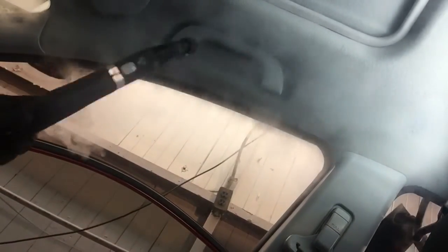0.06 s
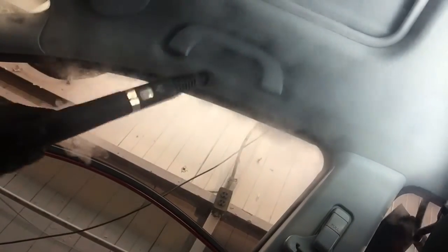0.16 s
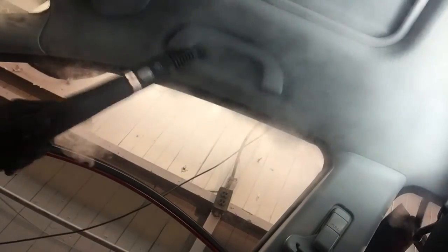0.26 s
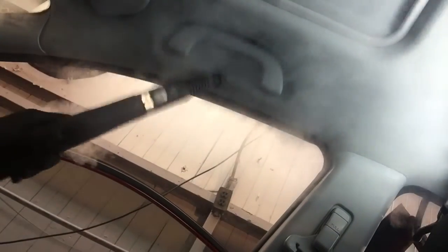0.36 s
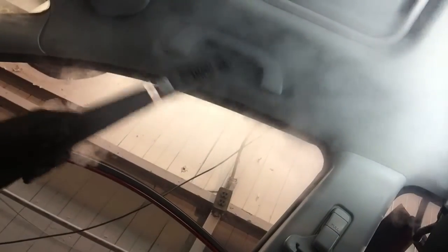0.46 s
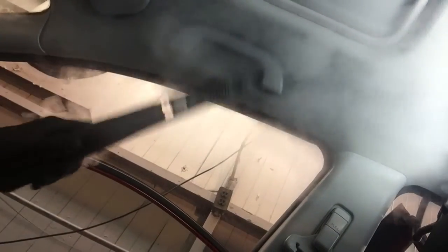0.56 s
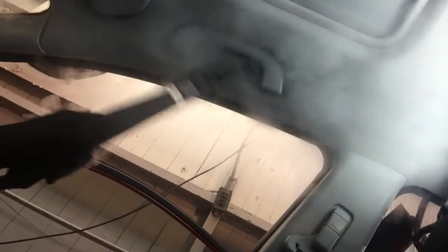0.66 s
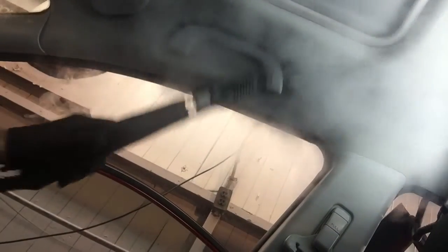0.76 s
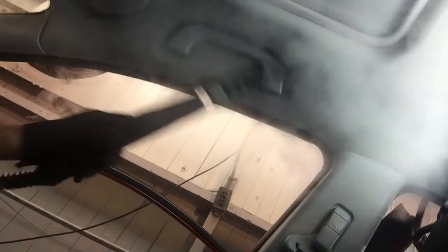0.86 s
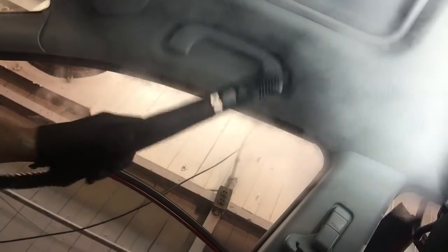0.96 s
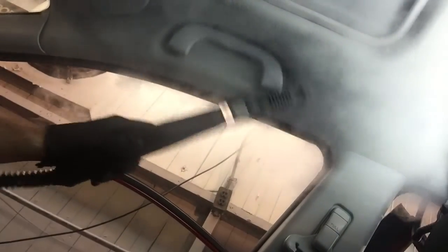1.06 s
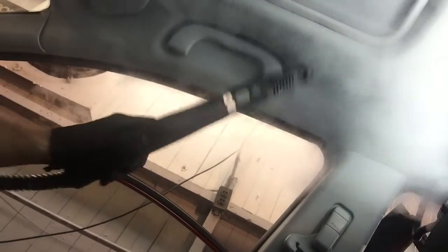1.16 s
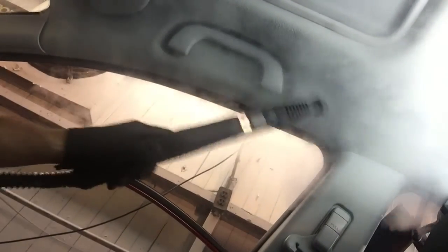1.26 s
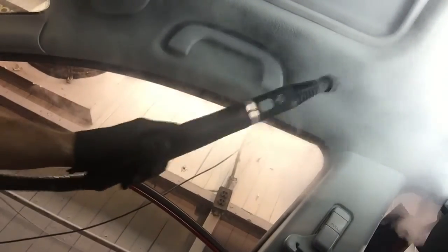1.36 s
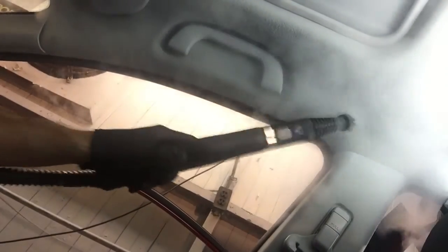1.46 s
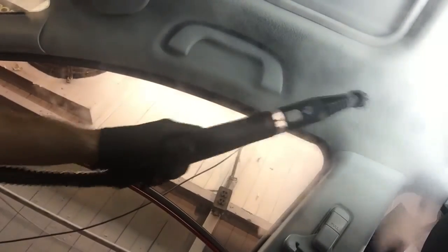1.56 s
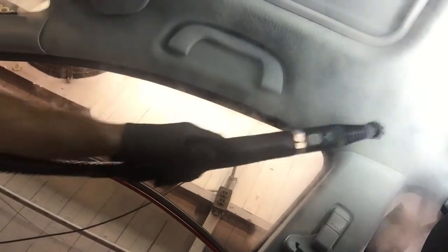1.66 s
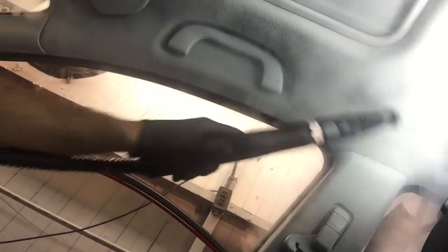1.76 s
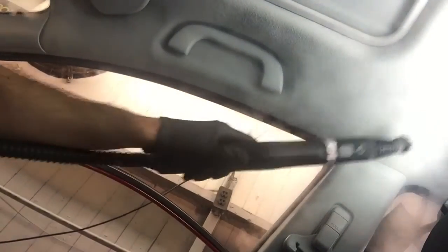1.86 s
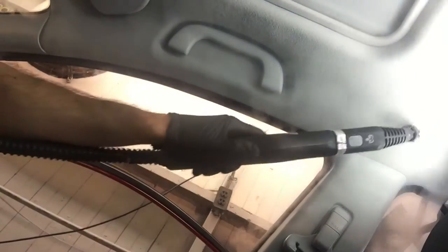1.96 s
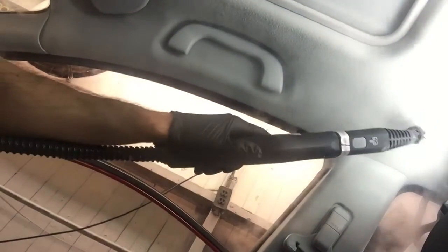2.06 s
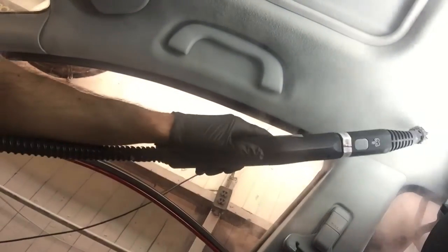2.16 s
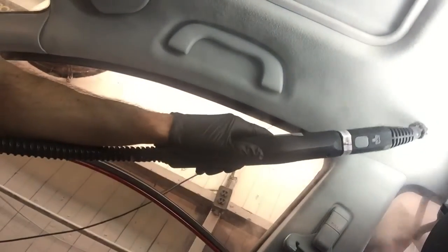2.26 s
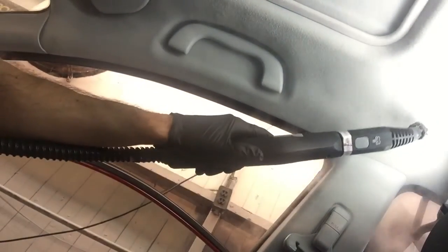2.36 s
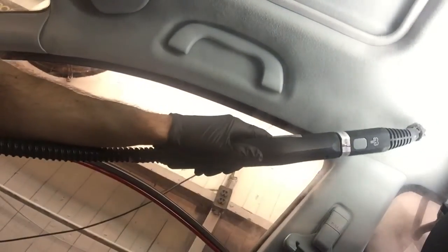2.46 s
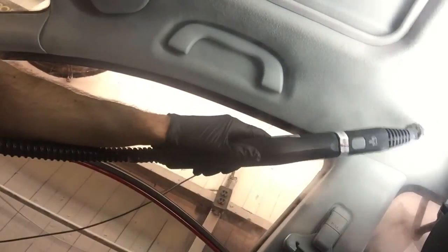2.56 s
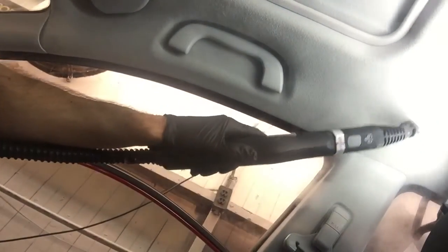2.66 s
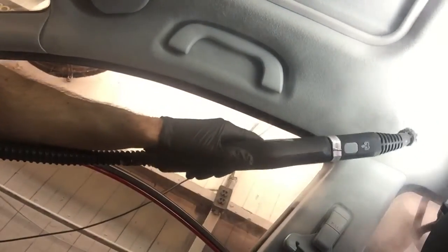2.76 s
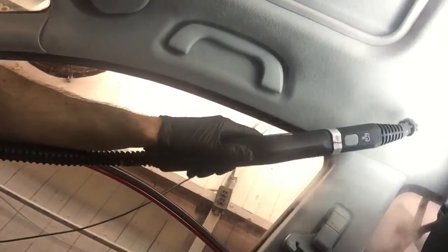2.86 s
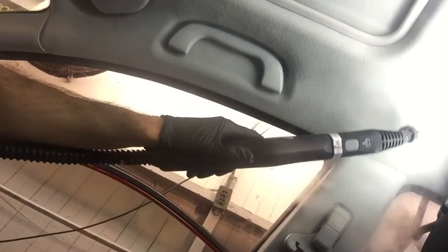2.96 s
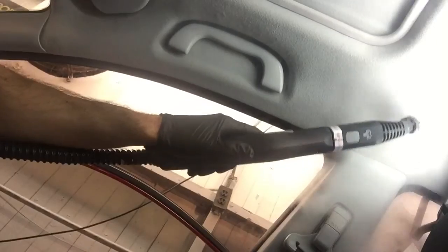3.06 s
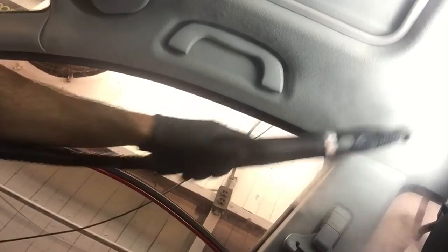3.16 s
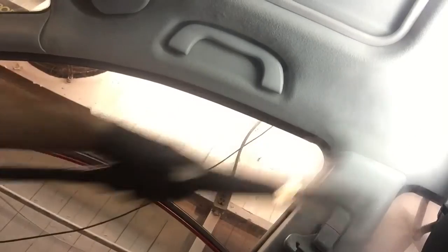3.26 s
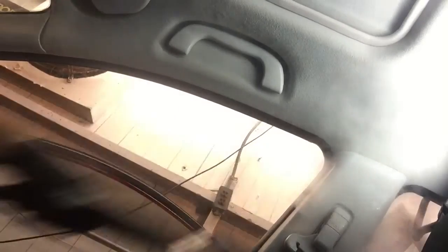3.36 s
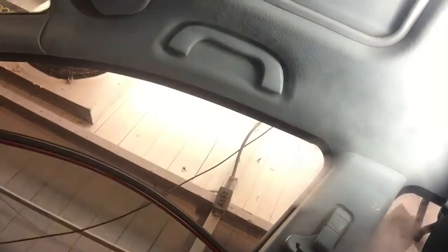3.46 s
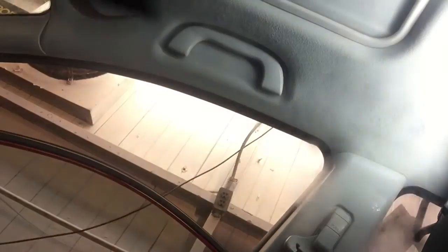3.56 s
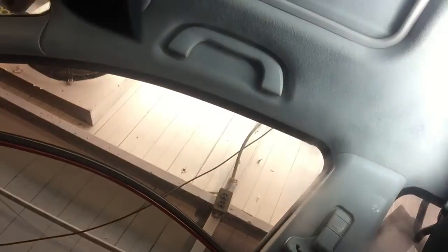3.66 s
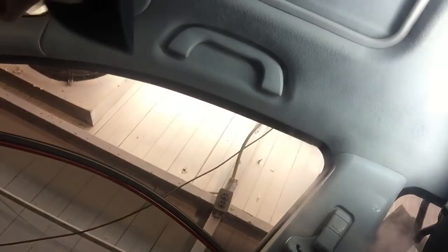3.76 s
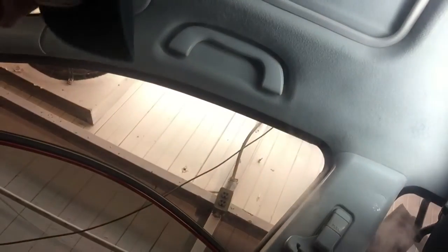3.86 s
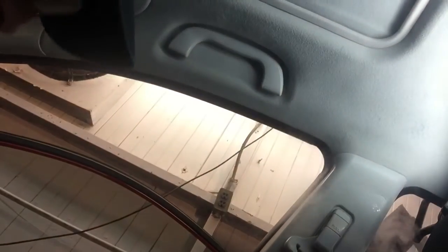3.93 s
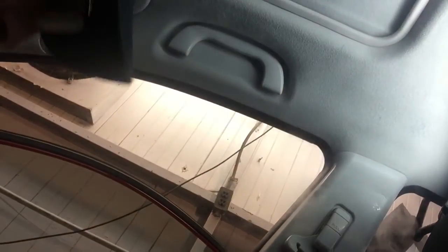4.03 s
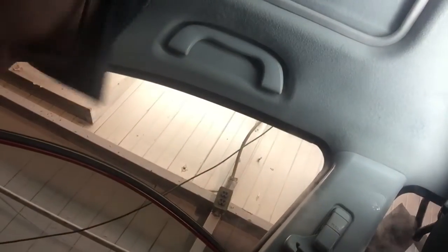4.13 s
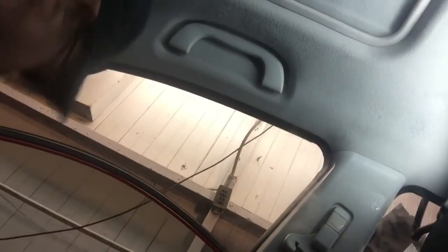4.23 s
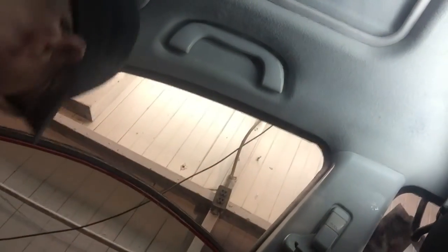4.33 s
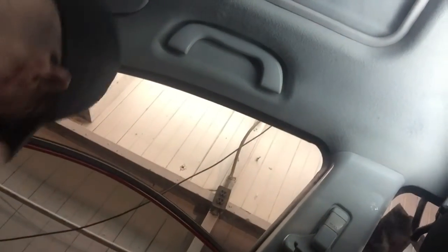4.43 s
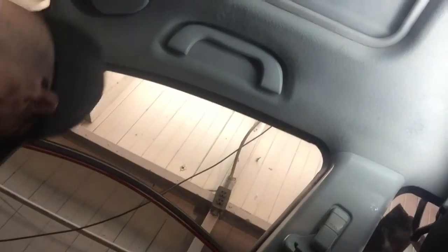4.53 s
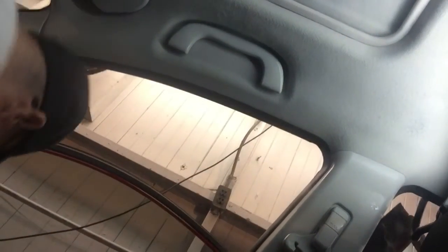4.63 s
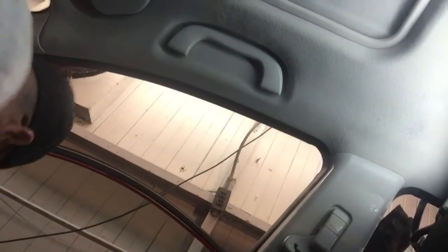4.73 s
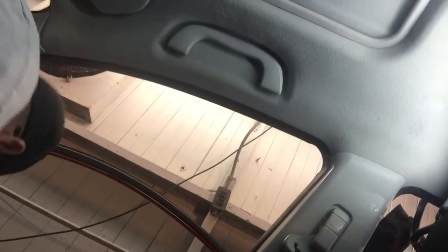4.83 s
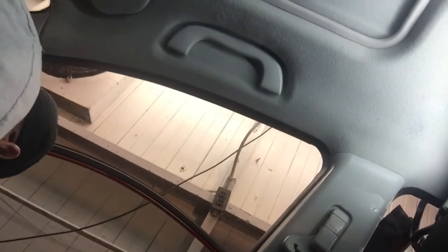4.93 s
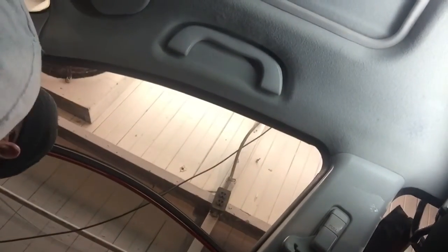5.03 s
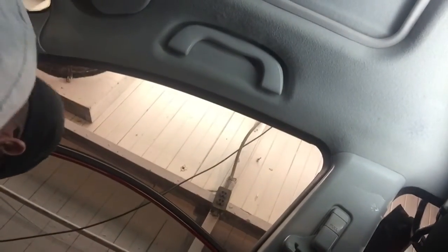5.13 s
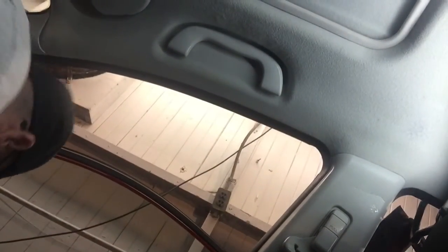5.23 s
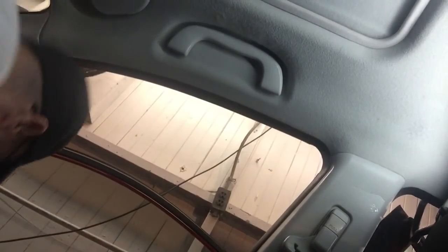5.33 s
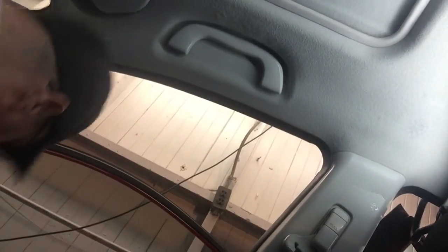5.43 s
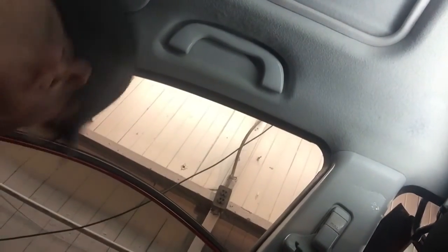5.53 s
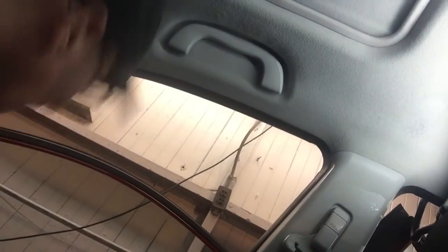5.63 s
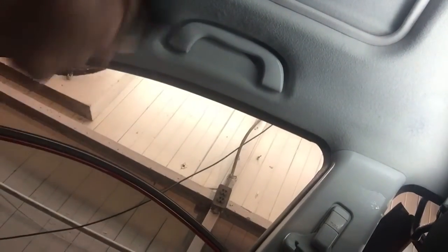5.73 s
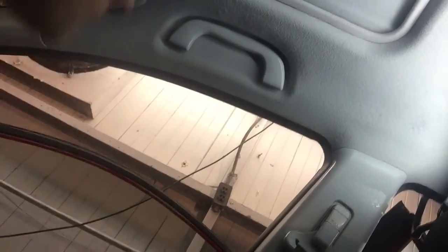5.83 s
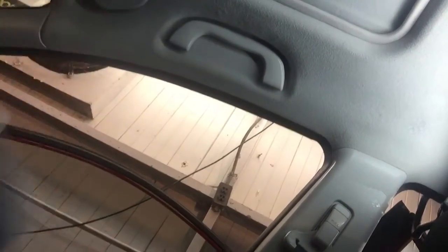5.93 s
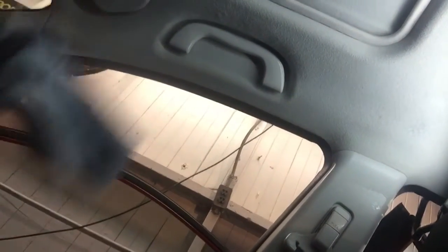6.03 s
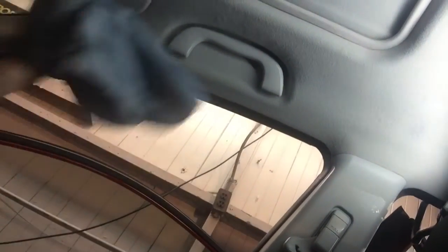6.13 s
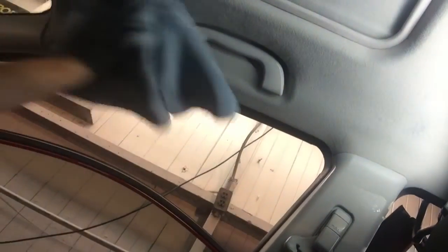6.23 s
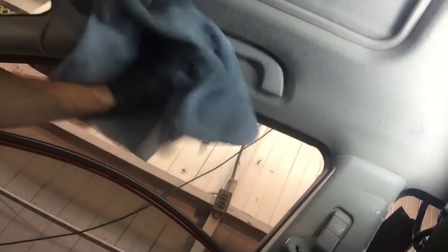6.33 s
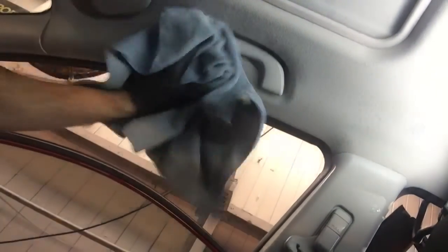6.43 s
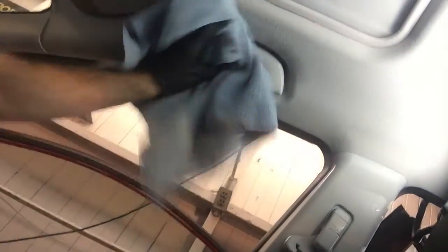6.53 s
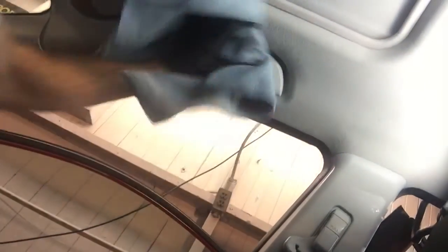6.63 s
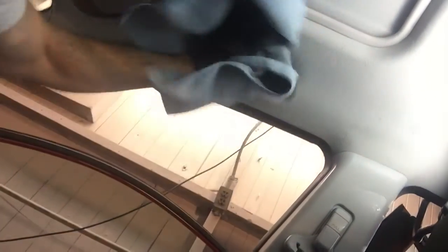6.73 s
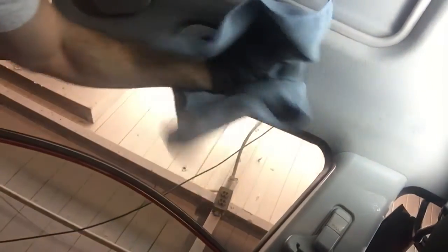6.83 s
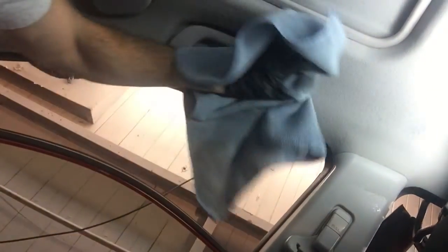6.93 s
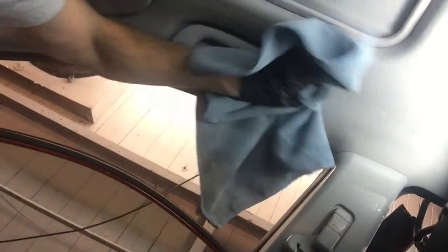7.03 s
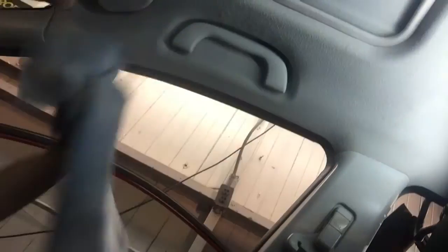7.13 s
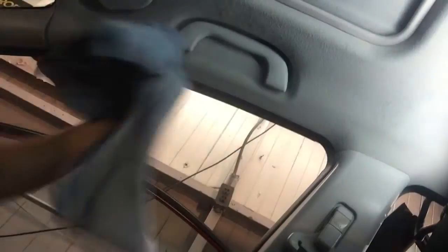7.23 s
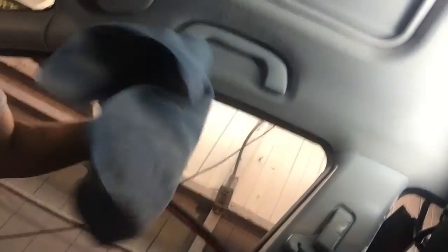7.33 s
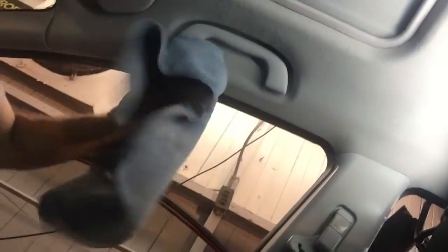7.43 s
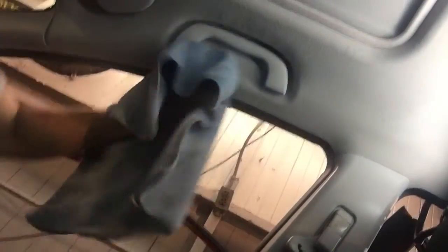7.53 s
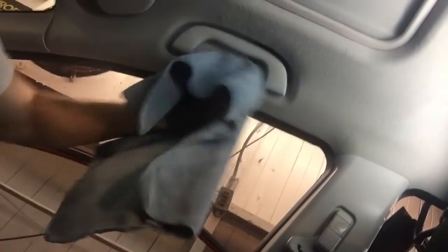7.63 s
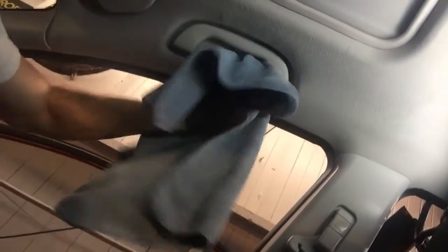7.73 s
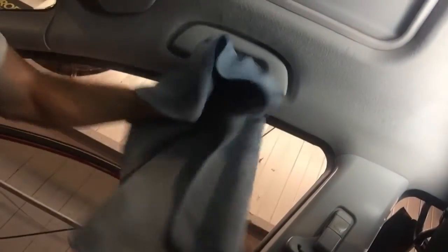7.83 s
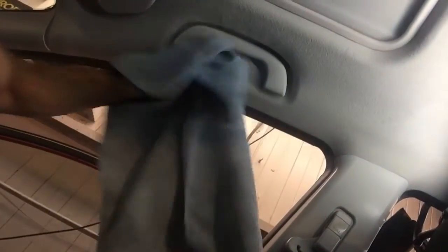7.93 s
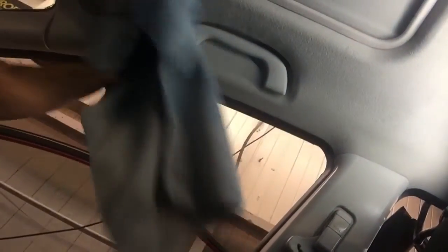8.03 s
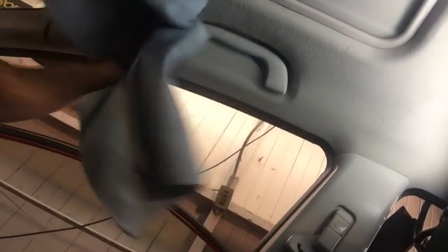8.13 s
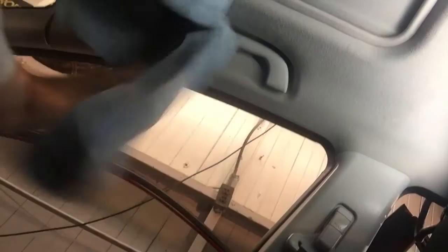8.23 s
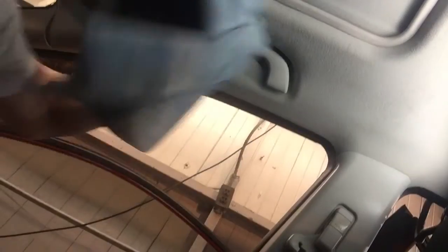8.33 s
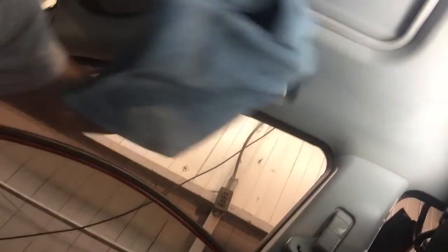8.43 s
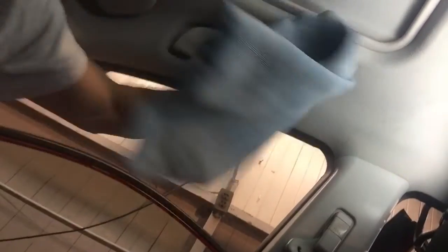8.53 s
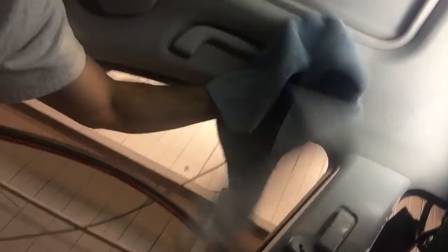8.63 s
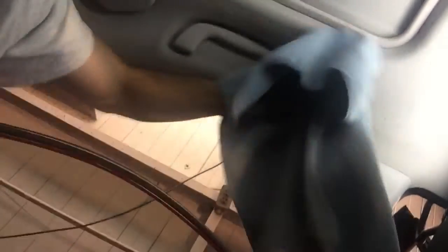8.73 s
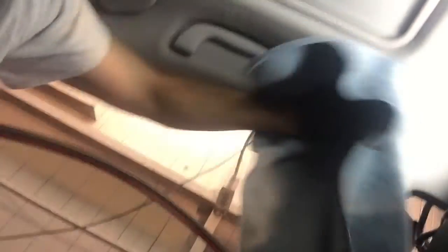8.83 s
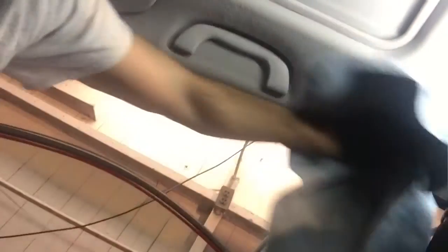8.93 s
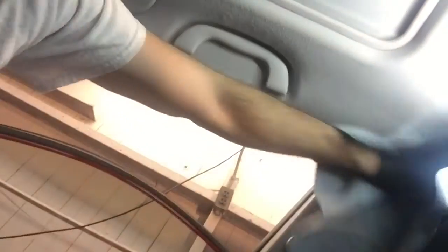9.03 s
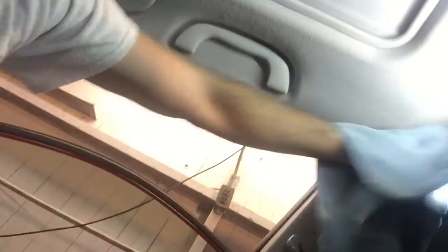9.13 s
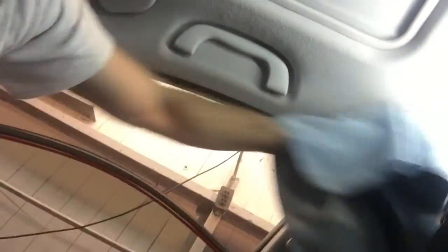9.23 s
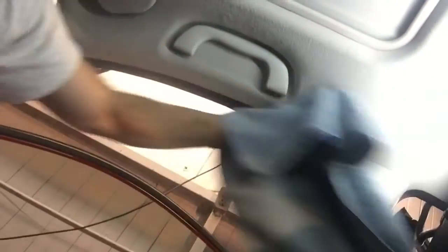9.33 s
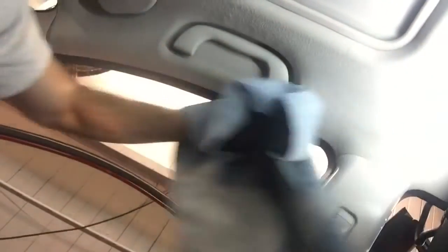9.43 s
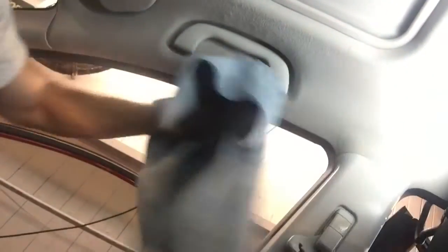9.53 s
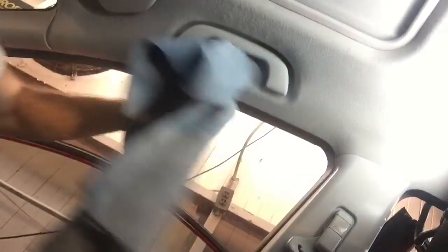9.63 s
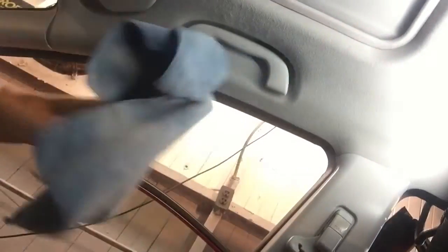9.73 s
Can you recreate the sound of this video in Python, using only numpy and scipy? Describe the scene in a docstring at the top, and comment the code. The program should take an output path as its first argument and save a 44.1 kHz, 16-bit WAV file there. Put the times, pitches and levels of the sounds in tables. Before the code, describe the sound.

Strong bright steam hiss for three seconds, a spitting cutoff, one hard clattering bang, near quiet, then brisk cloth scrubbing with hollow thumps.

```python
"""A steam jet hisses and roars over a car's roof lining, rests in a corner and sputters out.
The handheld steamer is set down with a bang, small things knock, then a towel rubs the lining:
the fibres hiss, the panel drones and the car body thuds. Behind it all is the microphone's own hiss.
Steam, cloth, car and hiss are shaped noise; knocks, bubbles and the ringing tool also use sine tones."""
import sys
import numpy as np
from scipy import signal
from scipy.fft import rfft, irfft, next_fast_len
from scipy.io import wavfile
from scipy.ndimage import uniform_filter1d, map_coordinates

SR = 44100
rng = np.random.default_rng(int(sys.argv[2]) if len(sys.argv) > 2 else 0)


def unload_audio(sound):
    """Save the sound as a 16-bit wav file, at the path given as the first command line argument."""
    columns = np.transpose(np.atleast_2d(sound))
    # keep every value between -1 and 1, then stretch to whole-number steps
    steps = np.round(np.clip(columns, -1, 1) * 32767)
    wavfile.write(sys.argv[1], SR, steps.astype(np.int16))


N = 431298  # length in samples


def amp(db):
    """Turn decibels into a gain."""
    return 10 ** (np.asarray(db) / 20)


def unit(x):
    """Scale x to an rms level of 1."""
    return x / np.sqrt(np.mean(x ** 2) + 1e-20)


def along(points, hz):
    """Read a curve of (pitch_hz, value) points, with pitch on a log scale."""
    f, v = np.transpose(points)
    return np.interp(np.log(hz + 1), np.log(f + 1), v)


def over_time(points):
    """Read a curve of (time_s, value) points at every sample."""
    return np.interp(np.arange(N) / SR, *np.transpose(points))


def wobble(rate):
    """A smooth random curve with rate random points a second."""
    points = rng.standard_normal(int(N * rate / SR) + 4)
    return map_coordinates(points, [np.arange(N) * rate / SR])


def filtered(x, response):
    """Shape x by a gain, real or complex, that depends on frequency."""
    m = next_fast_len(len(x) + SR // 2)  # spare room keeps the tail from wrapping round
    return irfft(rfft(x, m) * response(np.fft.rfftfreq(m, 1 / SR)), m)[..., :len(x)]


def resonance(f, centre_hz, width_hz):
    """Response of one springy part: strongest at its own pitch."""
    push = 1j * f * width_hz
    return push / (centre_hz ** 2 - f * f + push)


def swell_and_fade(u, fall=1.0):
    """A quick swell that then dies away; with fall 1 it peaks at 1 when u = 1."""
    return u * np.exp(1 - fall * u)


def patchy(patchy_db, size, comb_db, count, flares=()):
    """Noise with random loud and soft patches and the fine comb of the cabin's reflections."""
    hz, t, z = signal.stft(rng.standard_normal(N), SR, nperseg=512)
    field = rng.standard_normal(z.shape)
    for axis in (0, 1, 0, 1):
        field = uniform_filter1d(field, size[axis], axis)  # size = (frequency bins, time frames)
    field = patchy_db * unit(field)
    for s, centre_hz, db in flares:
        in_pitch = np.exp(-(np.log((hz + 1) / centre_hz) / .1) ** 2)
        in_time = np.exp(-((t - s) / .032) ** 2)
        field += db * np.outer(in_pitch, in_time)
    patches = signal.istft(z * amp(field), nperseg=512)[1]
    z = signal.stft(patches, nperseg=1024)[2]
    comb = rng.standard_normal(z.shape)
    for _ in range(2):
        comb = uniform_filter1d(comb, count, 1)  # a larger count of frames holds the comb stiller
    return signal.istft(z * amp(comb_db * unit(comb)), nperseg=1024)[1][:N]


# How steam pressure and treble change: start_s, level_db (before the band levels),
# treble_lift_db (before each band's share), sink (0-1, how far the 4 kHz band drops toward 3 kHz)
JET = [(0, -23.5, 1, 0), (.56, -22.5, 0, 0), (.8, -22.5, 3, 0), (.98, -22, -1, 1), (1.45, -23, 0.85, 1),
       (1.52, -23, .6, 0), (1.699, -25, 3.5, 0), (1.83, -21.5, -2.5, 0.3), (1.9, -23.5, 1, .1),
       (2.65, -22, 0, .1), (3.22, -23.5, 1, .1)]
# Colour of the jet moving along the lining: pitch_hz, level_db (per Hz, relative)
MOVING_COLOUR = [(60, -37), (369, -13.5), (561, -14), (725, -23.5), (854, -16.5), (1130, -18), (1930, -7.5),
                 (2220, -11), (3700, -3), (4500, -6.5), (5000, -14.5), (6630, -3.5), (10300, -4.5),
                 (11300, 3), (15700, -7.5)]
# Colour of the jet held in the corner: pitch_hz, level_db (per Hz, relative)
CORNER_COLOUR = [(60, -42), (378, -12.5), (549, -13), (676, -26), (815, -11.5), (1270, -14), (2320, -6.5),
                 (3550, -8.5), (4070, 1.5), (4420, -8), (4790, -20.5), (6790, -5.5), (8600, -18),
                 (12700, -6), (15700, -16)]
# Extra colour when the band has sunk: pitch_hz, change_db
SUNK_COLOUR = [(2300, -0.5), (3000, 4.5), (3500, 3), (4200, -4), (4900, -5), (6200, 0)]
# Where the jet splits into five bands, roar to top: pitch_hz
EDGES_HZ = [2200, 4800, 7800, 10400]
# One value per band, roar to top: level_db against the jet, moving and then cornered
MOVING_DB = (-12.5, -5, -2.5, -1, 0.5)
CORNER_DB = (-13.5, -2, -3.5, -5, -1.5)
# One value per band, roar to top: share of the treble lift
LIFT_SHARE = (0, 0.19, 0.59, 0.98, 0.45)
# The nozzle touches the corner, settles in it, leaves: time_s, share (0-1)
REACH = [(1.74, 0.02), (1.77, 1), (1.86, 0.8), (1.885, 0), (1.93, 0.16), (1.97, 0.99), (3.27, 0.94),
         (3.3, 0.08)]
# The valve closing: time_s, level_db (before each band's fading factor)
VALVE = [(3.235, 0), (3.268, -8), (3.31, -21.5), (3.34, -26), (3.462, -29), (3.472, -44), (3.53, -57),
         (3.6, -93.5)]
# Narrow parts of the hiss flare up briefly: time_s, pitch_hz (centre), rise_db
FLARES = [(.125, 11400, 12), (.264, 6200, 10), (.313, 11100, 11.5), (.447, 6300, 11.5), (.508, 9450, 8.5),
          (.641, 5500, 14.5), (.656, 12580, 10.5), (.729, 11000, 10), (.81, 3700, 7), (.836, 7300, 9),
          (1.03, 3300, 5), (1.24, 3400, 5), (1.53, 4000, 6), (1.55, 5800, 12), (1.71, 5870, 12.5),
          (1.94, 11500, 8), (2.03, 11200, 8), (2.078, 11800, 8), (2.84, 12000, 9), (3.05, 12500, 9)]
# The cabin's bright bands, where weaker flares come at random: pitch_hz
BRIGHT_HZ = (6570, 9300, 11300, 12600)
FLARES_PER_S, FLARE_DB = 12, 3.5  # averages for the weaker flares


def steam():
    """Rushing steam makes turbulent noise; narrow bands flare up as the nozzle moves."""
    cornered = np.clip(over_time(REACH), 0, 1)
    shut_db = over_time(VALVE)
    chance = rng.random((40, 3))
    when = np.cumsum(2 * chance[:, 0]) / FLARES_PER_S
    which = (len(BRIGHT_HZ) * chance[:, 1]).astype(int)
    weak = zip(when, np.take(BRIGHT_HZ, which), 2 * FLARE_DB * chance[:, 2])
    moving = patchy(2.3, size=(10, 4), comb_db=3.0, count=8, flares=[*FLARES, *weak])
    still = patchy(1.7, size=(7, 6), comb_db=3.5, count=40, flares=FLARES)

    t = np.arange(N) / SR
    s, level, lift, sink = np.transpose(JET)
    sunk = np.clip(np.interp(t, s, sink), 0, 1)
    edges, jet = [0, *EDGES_HZ, SR], np.zeros(N)
    fadings = (0.51, 0.83, 0.79, 1.17, 1.15)  # the top bands die fastest as pressure falls
    bands = zip(edges, edges[1:], MOVING_DB, CORNER_DB, LIFT_SHARE, fadings)
    for lo, hi, moving_db, corner_db, share, fading in bands:
        def band(x, colour):
            """Colour x and keep only this band, at rms 1."""
            return unit(filtered(x, lambda hz: amp(along(colour, hz)) * (hz >= lo) * (hz < hi)))

        swept = band(moving, MOVING_COLOUR)
        lowered = filtered(swept, lambda hz: amp(along(SUNK_COLOUR, hz)))
        swept = (1 - sunk) * swept + sunk * lowered
        mix = np.sqrt(1 - cornered) * amp(moving_db) * swept
        mix += np.sqrt(cornered) * amp(corner_db) * band(still, CORNER_COLOUR)
        jet += amp(np.interp(t, s, level + share * lift) + fading * shut_db) * mix
    gurgle_db = 0.53 + 1.9 * np.clip(-shut_db / 20, 0, 1)  # droplets: most flutter as the flow dies
    return jet * amp(gurgle_db * wobble(60))


# Water spat by the dying jet: start_s, level_db (before the shaping below),
# pitch_hz (nozzle ring), decay_s (time for the puff to fall 60 dB)
SPITS = [(3.283, -13, 6130, 0.05), (3.3283, -20, 6900, 0.015), (3.356, -22, 2420, 0.02),
         (3.392, -24, 1130, 0.025), (3.41, -22, 5850, 0.025), (3.44, -20.5, 4120, 0.018)]


def spits():
    """Each slug of water bursts out as a short bright puff that rings the nozzle."""
    out, t = np.zeros(N + SR), np.arange(SR // 10) / SR
    for s, db, pitch_hz, decay_s in SPITS:
        fall = amp(db - 12.0 - 60 * t / max(decay_s, .005))
        puff = fall * (1 - np.exp(-t / 0.0023)) * rng.standard_normal(len(t))
        ringing = filtered(puff, lambda f: .6 + 4 * resonance(f, pitch_hz, 350))
        out[round(s * SR):][:len(t)] += ringing
    bright = [(300, 6), (1500, 9.0), (7000, 11), (15000, -6.5)]  # pitch_hz, level_db
    return filtered(out[:N], lambda hz: amp(along(bright, hz)))


# Bubbles in the emptying nozzle: start_s, peak_db, pitch_hz (at the start), cycles (to the peak)
BUBBLES = [(3.344, -40, 3000, 6), (3.369, -42, 4300, 14), (3.394, -37, 2950, 5), (3.418, -38, 1800, 8)]


def droplets():
    """Small bubbles burst in the nozzle as it empties: short notes that bend upward."""
    out, t = np.zeros(N), np.arange(SR // 40) / SR
    for s, db, pitch_hz, cycles in BUBBLES:
        u = t * pitch_hz / cycles
        note = np.sin(2 * np.pi * pitch_hz * t * (1 + .014 * u))
        out[round(s * SR):][:len(t)] += amp(db) * swell_and_fade(u) * note
    return out


def strokes(rows, edges, rest_db):
    """Loudness of strokes that rise, hold with a swell and fall; their powers add over a rest level."""
    t = np.arange(0, N, 32) / SR
    power = amp(2 * rest_db)
    rise, fall = edges
    for s, length, db, swell_db in rows:
        held = db + swell_db * (np.clip((t - s) / length, 0, 1) - .5)
        before, after = np.maximum(s - t, 0), np.maximum(t - s - length, 0)
        power = power + amp(2 * (held - rise * before - fall * after))
    return np.interp(np.arange(N) / SR, t, np.sqrt(power))


# Cloth rubs, first clothes on the seat, then the towel on the lining: start_s, length_s,
# fibre_db, upper_drone_db, deep_drone_db, swell_db (change over the stroke)
RUBS = [(3.412, 0.073, -60, -50.5, -50, 4.5), (3.6, 0.055, -68, -50, -60, 0),
        (3.745, 0.11, -72, -52, -58, 0), (4.175, 0.22, -58.5, -51.5, -56, -4.5),
        (4.392, .33, -71.5, -60, -56.5, -4), (4.753, 0.058, -61, -60.5, -61, -0.5),
        (5.49, .17, -65.5, -64, -66, -5), (5.822, 0.104, -65, -53, -53, 1),
        (6.283, 0.029, -44, -43.5, -38, -1), (6.345, 0.039, -55, -57.5, -53, 5),
        (6.466, .13, -54, -49, -46.5, 3), (6.66, .11, -47, -48.5, -47, 2.5),
        (6.789, 0.3386, -50, -52, -49.5, -0.5), (7.22, 0.078, -75, -57, -54, 6),
        (7.306, .15, -55, -43, -42.5, -7), (7.499, 0.057, -57.5, -40, -42.5, -5.5),
        (7.55, 0.18, -51.5, -42, -41.5, 6.5), (7.755, 0.032, -57, -38.5, -40.5, -0.5),
        (7.889, 0.12, -48.5, -38, -42.5, 7.5), (8.057, 0.045, -54, -39, -37.5, 11),
        (8.233, 0.157, -52.5, -45.5, -44.5, -0.5), (8.406, .2, -48.5, -42.5, -47, -1.5),
        (8.698, 0.12, -53.5, -51, -51.5, 1), (8.825, .31, -50.5, -42, -47, -3.5),
        (9.23, .25, -49, -43, -56, 4), (9.507, .2, -54.5, -50.5, -46.5, -3),
        (9.724, .1, -49.5, -41, -40.5, 0)]
# Colour of the fibre hiss: pitch_hz, level_db (per Hz, relative)
FIBRES = [(440, -47.5), (750, -54), (1100, 0), (1950, -1.5), (3900, -4), (4990, -16), (10300, -20.5),
          (15700, -30)]
# Panel resonances, two deep and then three upper: pitch_hz, width_hz, level_db (relative)
PANEL = [(184, 160, -0.5), (264, 150, 1.5), (420, 81, 0.5), (582, 84, -1), (907, 200, -13)]
# How fast strokes come and go: rise_db_per_s, fall_db_per_s
HISS_EDGES = (610, 650)
DRONE_EDGES = (400, 420)
RUSTLE_DB, HUM_DB = -74, -71  # fibres and panel at rest
LUMPS_DB, LUMPS_PER_S = 3, 40  # unevenness of what drives the drone


def towel():
    """Fibres catch in tiny grains; the stroke drums the lining's resonances in lumps."""
    def rub_gain(column, edges, rest_db):
        """Loudness of one column of the rubs."""
        rows = [(row[0], row[1], row[column], row[5]) for row in RUBS]
        return strokes(rows, edges, rest_db)

    hiss = rub_gain(2, HISS_EDGES, RUSTLE_DB)
    upper = rub_gain(3, DRONE_EDGES, HUM_DB)
    deep = rub_gain(4, DRONE_EDGES, HUM_DB)

    catches = patchy(1.5, size=(6, 6), comb_db=3.5, count=8) * amp(0.74 * wobble(300))
    fibres = filtered(catches, lambda hz: amp(along(FIBRES, hz)))
    fibres /= np.std(filtered(fibres, lambda hz: (hz > 1500) & (hz < 4500)))  # this band sets the level

    def lining(modes):
        """Response of several resonances with alternating signs."""
        return lambda f: sum((-1) ** k * amp(db) * resonance(f, centre_hz, width_hz)
                             for k, (centre_hz, width_hz, db) in enumerate(modes))

    lumps = rng.standard_normal(N) * amp(LUMPS_DB * wobble(LUMPS_PER_S))
    lumps = filtered(lumps, lambda hz: 1 / (1 + 1j * hz / 1400) ** 2)  # soft cloth drives little treble
    drone = deep * unit(filtered(lumps, lining(PANEL[:2])))
    drone += upper * unit(filtered(lumps, lining(PANEL[2:])))
    return hiss * amp(0.61 * wobble(25)) * fibres + amp(1.5 * wobble(12)) * drone


# How fast a noise burst dies in the cabin: pitch_hz, decay_s (60 dB fall, before "faster" shortens it)
CABIN = [(100, 0.33), (1000, .3), (4000, 0.29), (12000, 0.04)]


def dying(spectrum, faster):
    """A noise burst of energy 1 whose pitches die at the cabin's speeds, times faster."""
    hz, t, z = signal.stft(rng.standard_normal(SR // 2), SR, nperseg=256)
    decay_s = along(CABIN, hz)[:, None] / faster
    shape = amp(along(spectrum, hz)[:, None] - 60 * t / decay_s)
    tail = signal.istft(z * shape, SR, nperseg=256)[1][:SR // 2]
    return tail / np.linalg.norm(tail)


# Ringing parts of the tool: pitch_hz, level_db (against the bang), decay_s (time to fall 95 dB)
STEAMER = [(70.2, -22.5, 0.5), (385, -2, 0.14), (654, -14, 0.17), (1490, -12.5, 0.16), (1896, -19, 0.083),
           (2100, -19, 0.23), (2740, -20.5, 0.1), (2950, -19, 0.2), (3590, -13.5, 0.033)]
# Colour of its rattle: pitch_hz, level_db (per Hz, relative)
CLATTER = [(59, -52), (100, -8.5), (265, -12.5), (404, -6), (1020, -14), (2660, -18), (5010, -34),
           (15700, -40.5)]
BANG_S, BANG_DB = 4.061, -6.5  # time, and the level its parts are set against


def bang():
    """The steamer grazes the seat, then lands: its shell rings and rattles."""
    out, t = np.zeros(N), np.arange(SR // 2) / SR
    start = round(BANG_S * SR)
    ring = sum(amp(db - 95 * t / decay_s) * np.sin(2 * np.pi * pitch_hz * t)
               for pitch_hz, db, decay_s in STEAMER)
    out[start:][:len(t)] = amp(BANG_DB) * ring * (1 - np.exp(-t / 0.0023))
    rattle = dying(CLATTER, faster=2.7) * (1 - np.exp(-t / 0.001))
    out[start:][:len(t)] += amp(BANG_DB + 22.0) * rattle
    graze = amp(-np.arange(900)[::-1] / 24) * rng.standard_normal(900)  # grows until the landing
    graze = filtered(graze, lambda f: resonance(f, 1350, 500))
    out[start - 900:][:900] += amp(BANG_DB - 8.5) * graze
    return out


# Knocks on trim and lining: start_s, level_db (peak of the main note), pitch_hz,
# scuff_db (before its colour), rise_s,
# and for a squeezed one also bend (upward share of the pitch per rise time)
KNOCKS = [(3.486, -37, 115, -62, 0.009), (3.663, -41, 300, -44, 0.006), (4.206, -33, 332, -60, 0.004),
          (4.218, -25.5, 498, -50, 0.0045), (4.38, -42.5, 462, -60, 0.0069), (4.462, -35, 130, -56, 0.008),
          (4.494, -37, 400, -67, 0.0049), (4.547, -31, 290, -72, 0.005), (4.602, -44, 440, -72, 0.007),
          (4.654, -39, 250, -66, 0.0066), (5.502, -48, 285, -43.5, 0.0055), (5.549, -49, 202, -50, 0.0026),
          (5.724, -52, 283, -51.5, 0.0062), (5.856, -49, 537, -42, 0.0032), (5.875, -25, 510, -40, 0.0035),
          (5.925, -28, 430, -56, 0.007, .06), (6.317, -29.5, 292, -38, 0.004),
          (7.079, -30, 510, -52, 0.0033), (7.311, -25, 281, -32, 0.005), (7.481, -22, 464, -49, 0.0029),
          (7.674, -38, 500, -50, 0.005), (7.871, -38, 287, -50, 0.0072), (7.985, -19, 395, -25, 0.0038),
          (8.016, -12, 278, -48, 0.0041), (8.08, -32, 254, -42.5, 0.0039), (8.609, -31, 270, -48, 0.0035),
          (8.651, -35, 186, -57, 0.0068), (8.822, -30, 520, -51, 0.004), (8.857, -27, 520, -49.5, 0.006),
          (8.877, -31, 480, -42, 0.005), (8.898, -26, 470, -35, 0.0026), (8.933, -23, 300, -55, 0.003),
          (9.001, -39, 603, -46, 0.0052), (9.049, -30, 430, -45, 0.0071), (9.316, -37, 504, -41, 0.0063),
          (9.456, -26, 445, -27.5, 0.0029), (9.605, -29.5, 282, -61, 0.0066),
          (9.748, -30.5, 203, -35, 0.0049)]


def knocks():
    """A soft push swells a hollow note with overtones and a dull thud; contact noise scuffs above."""
    notes, thuds, scuffs = np.zeros((3, N + SR))
    t = np.arange(SR // 10) / SR
    for s, db, pitch_hz, scuff_db, rise, *bend in KNOCKS:
        u = t / max(rise, .001)
        start = round(s * SR)
        at = slice(start, start + len(t))
        waver = 0.3 * uniform_filter1d(rng.standard_normal(len(t)), size=100)
        phase = 2 * np.pi * pitch_hz * np.cumsum(1 + waver + sum(bend) * u) / SR
        edge = min(amp(.6 * (db + 18)), .6)  # harder knocks carry more overtones
        overtones = np.sin(1.9 * phase) + .3 * np.sin(2.9 * phase)
        note = np.sin(phase) + edge * np.exp(-.2 * u) * overtones
        notes[at] += amp(db) * swell_and_fade(u) * note
        thuds[at] += amp(db + 6) * swell_and_fade(u, 1.4) * rng.standard_normal(len(t))
        scuffs[at] += amp(scuff_db + 6) * swell_and_fade(u, 1.45) * rng.standard_normal(len(t))
    # both colours: pitch_hz, level_db
    dull = [(100, -2.5), (250, 5), (600, 4), (850, -9), (1700, -20), (2500, -45)]
    bright = [(300, -10), (1200, 6), (4000, 0), (6000, -24), (15000, -28)]
    thud = filtered(thuds[:N], lambda hz: amp(along(dull, hz)))
    scuff = filtered(scuffs[:N], lambda hz: amp(along(bright, hz)))
    return notes[:N] + thud + scuff


# The car lurches: start_s, length_s, level_db, swell_db (change over the thud)
THUDS = [(3.31, 0.18, -49, 13), (3.68, 0.14, -42, -8), (3.99, .04, -54, .1), (4.064, 0.067, -35, -8),
         (4.21, 0.026, -36, -2), (4.41, 0.2, -46, 0), (4.665, 0.074, -42, -8), (4.84, 0.065, -50, -2),
         (5.3, .05, -56, 5.7), (5.5, 0.13, -48.5, 0), (5.82, 0.078, -42, 13), (6.275, 0.11, -35.5, 2),
         (7.31, 0.11, -42.5, -3), (9.55, .04, -44.5, -7.5)]
# Colour of the shaking car: pitch_hz, level_db (per Hz, relative)
SHAKE = [(38, -21.5), (50, -6.5), (68, 5), (113, -10), (150, -10.5), (200, -32), (330, -120)]
# How fast thuds come and go: rise_db_per_s, fall_db_per_s
THUD_EDGES = (1700, 200)
STILL_DB, SWAY_DB = -79.5, -6  # the car at rest; its sway under each rub, against the deep drone


def body():
    """Low thuds of the car, and its sway under every rub; springs keep the swing fairly even."""
    sway = unit(filtered(rng.standard_normal(N), lambda hz: amp(along(SHAKE, hz))))
    recent_power = np.abs(uniform_filter1d(sway ** 2, size=900))
    sway = sway / (recent_power + .05) ** .4 * amp(1.5 * wobble(17))
    pushes = [(s, length, deep_db + SWAY_DB, swell) for s, length, _, _, deep_db, swell in RUBS]
    return strokes([*THUDS, *pushes], THUD_EDGES, STILL_DB) * unit(sway)


def scene():
    """Add up all sources; the knocks and the bang also fill the cabin with a short echo."""
    taps, drop = knocks(), bang()
    room = dying([(100, 0.5), (1500, -4), (15000, 2.5)], faster=0.73)
    cabin = signal.fftconvolve(amp(-20) * taps + amp(-15) * drop, room)[:N]
    total = steam() + spits() + droplets() + towel() + body() + taps + drop + cabin
    return total[None].repeat(2, axis=0)  # the same sound in both channels


# Colour of the microphone's hiss, strongest near 12 kHz: pitch_hz, level_db (per Hz, relative)
HISS = [(65, -39.5), (110, -13.5), (390, -10.5), (700, -17), (1400, -19), (2630, -9.5), (4900, -17),
        (6700, -14), (8800, -18), (10400, -19.5), (10900, -7), (11900, -0.5), (13000, -8.5), (13800, -18),
        (15700, -16)]
# The hiss wavers in level: time_s, level_db
HISS_DB = [(0, -61), (6.9, -64), (7.8, -59.5), (8.6, -63.5), (9.78, -65)]
# The level dips briefly: start_s, deepest_s, end_s, depth_db
DIP = (7.145, 7.157, 7.18, -18)
LIMIT = .85  # the microphone overloads softly toward this level
TOP_HZ = 15750  # nothing is heard above


def record(dry):
    """One microphone adds hiss and soft overload; then come a brief dip and the treble limit."""
    noise = patchy(1.1, size=(4, 8), comb_db=3, count=8)
    hiss = amp(over_time(HISS_DB)) * unit(filtered(noise, lambda hz: amp(along(HISS, hz))))
    dip = amp(np.interp(np.arange(N) / SR, DIP[:3], [0, DIP[3], 0]))
    heard = (dry[0] + hiss) / (1 + (dry[0] / LIMIT) ** 4) ** (1 / 4)
    return np.tile(filtered(heard * dip, lambda hz: hz < TOP_HZ), (len(dry), 1))


dry = scene()
out = record(dry)
unload_audio(out)
```